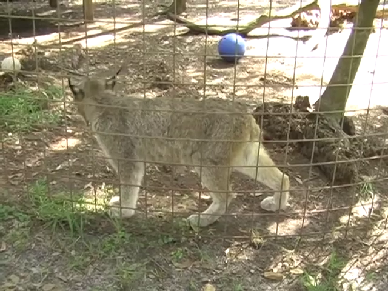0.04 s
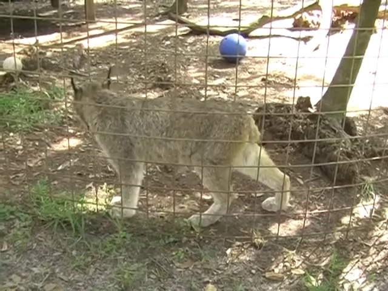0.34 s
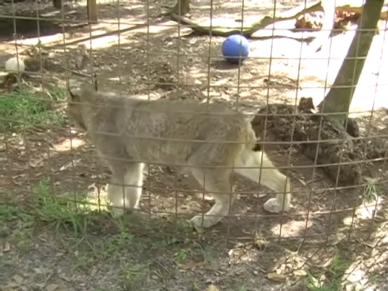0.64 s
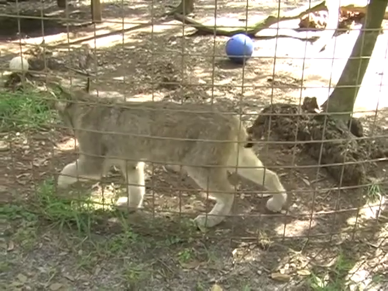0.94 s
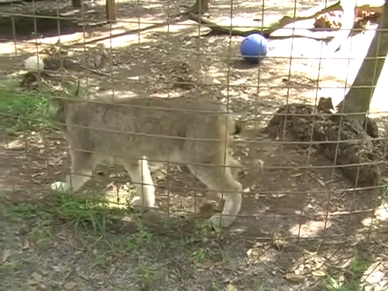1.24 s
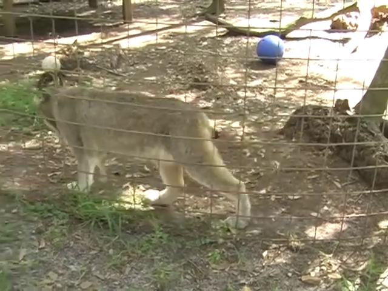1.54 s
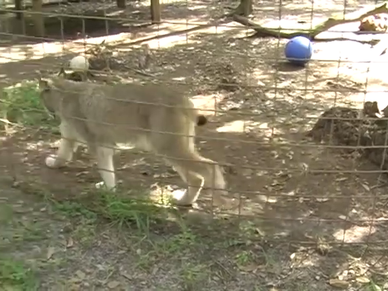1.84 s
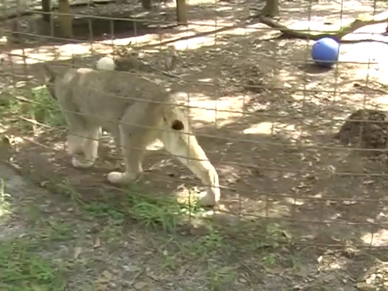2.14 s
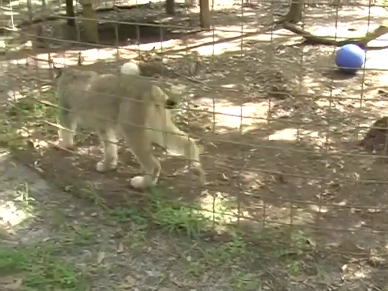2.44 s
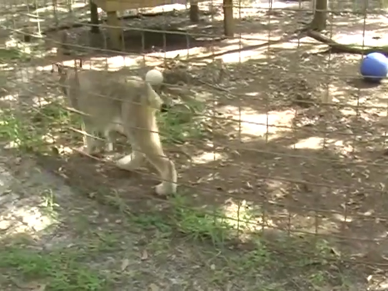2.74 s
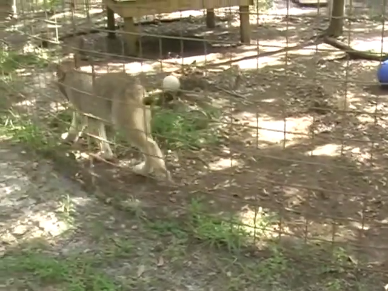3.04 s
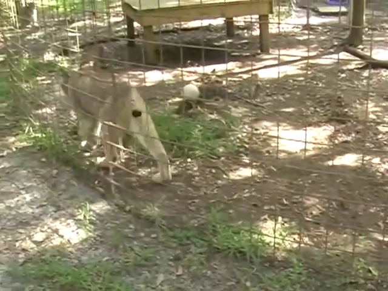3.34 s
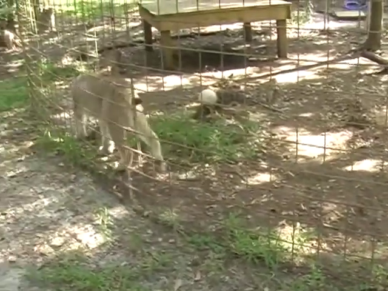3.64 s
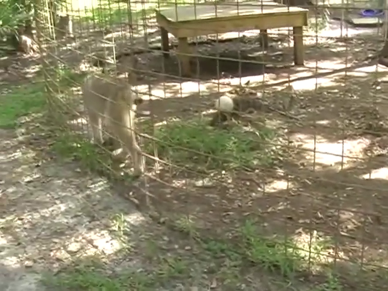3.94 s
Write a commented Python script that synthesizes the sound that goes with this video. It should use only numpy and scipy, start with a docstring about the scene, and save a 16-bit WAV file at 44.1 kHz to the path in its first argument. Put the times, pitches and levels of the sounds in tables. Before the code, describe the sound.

A lynx gives one brief falling call, then faint leaf rustles over a distant engine rumble.

```python
"""An outdoor pen: a distant engine, faint mains hum and thin whines under a steady wash of rumble and hiss. A
lynx ends a short, nearly pure call that falls and roughens as its voice slackens; the pen echoes it. It walks
off over dry leaves: faint crackles under its paws, a few small cracks, one sharp snap. The recorder cuts narrow
notches at even steps and leaves little treble."""
import sys
import numpy as np
from scipy import signal
from scipy.fft import rfft, irfft
from scipy.io import wavfile

SR = 44100
rng = np.random.default_rng(int(sys.argv[2]) if len(sys.argv) > 2 else 0)


def digitize_waveform(pressure):
    """Quantize a signal to 16-bit integers and store it at the path in sys.argv[1].

    Rows of a 2-D input are taken as channels; values are limited to [-1, 1].
    """
    field = np.atleast_2d(pressure).T
    bounded = np.clip(field, -1, 1)
    quanta = np.round(bounded * 32767).astype(np.int16)
    wavfile.write(sys.argv[1], SR, quanta)


N = 176400
T, HZ = np.arange(N) / SR, np.arange(N // 2 + 1) * SR / N

WASH_DB, WASH_FLICKER_DB = -40, .5
ENGINE_HZ, ENGINE_WANDER, ENGINE_PAN_DB, TONE_WAVER_DB = 35.78, .003, -.5, 1.5
SWELL_AT_S, SWELL_WIDTH_S, SWELL_HZ, SWELL_DB = 1.978, .022, 180, -36
STEP_ATTACK_S, GRAINS_PER_S = .015, 2000
CRACK_HOLD_S, CRACK_DECAY_S, RING_DB, RING_DECAY_S = .0018, .0012, -3.5, .0038
PEN_T60_S, PEN_TAIL_DB, CALL_PAN_DB, CALL_RIGHT_LAG_S = .5, -25, .8, .000065
JITTER, SHIMMER_DB, OVERTONE_WAVER_DB, CALL_RELEASE_S = .002, .15, 2.5, .005
SLACK_FALL_HZ, SLACK_ROUGH = 100, 3.0   # the voice slackens over this fall and gains this much roughness
NOTCH_STEP_HZ, NOTCH_FEEDBACK, NOTCH_LEAK, CUTOFF_HZ = 300, .8, .04, 15750


def from_db(db):
    """Decibels to gain."""
    return 10 ** (np.asarray(db) / 20)


def unit_power(x):
    """Scale to an RMS of 1."""
    return x / np.sqrt(np.mean(x ** 2) + 1e-20)


def over_hz(points):
    """A curve through (frequency, value) points along log frequency."""
    hz, value = np.transpose(points)
    return np.interp(np.log(HZ + 1e-9), np.log(hz), value)


def pan(db):
    """Stereo gains that put the left db above the right."""
    return from_db(np.array([[.5], [-.5]]) * db)


def drift(rate_hz):
    """Smooth random modulation of spread 1, mostly slower than rate_hz."""
    spectrum = rfft(rng.standard_normal(N)) / (1 + (HZ / rate_hz) ** 2)
    return unit_power(irfft(spectrum * (HZ > 0), N))


def diffuse_noise(gain):
    """Noise from all around as two microphones get it, with the spectrum gain, at unit power."""
    # stereo width: (frequency [Hz], side against mid [dB])
    widths = [(30, -2), (55, 1), (95, 2), (135, -4), (175, -7), (210, -6.5), (350, -7.5), (520, -11),
              (750, -10), (1600, -6.3), (4200, -7.2), (5700, -6.5), (8000, -7), (10000, -5), (12000, -1.7)]
    # phase between the microphones: (frequency [Hz], left lead [rad])
    lead = [(150, -.05), (450, -0.44), (750, -.27), (1150, -0.8), (1900, -.5), (4200, 0), (5800, -1.7),
            (7200, -2.5), (10000, -3), (12000, -4.5)]
    # balance: (frequency [Hz], left over right [dB])
    balance = [(100, -.7), (750, .4), (1200, -1.6), (1900, -2.9), (3000, -2.6), (5700, .4), (12000, .8)]
    mid, side = np.exp(2j * np.pi * rng.random((2, len(HZ))))
    width = from_db(over_hz(widths))
    pair = (mid + width * side * [[1], [-1]]) / np.hypot(1, width)
    phase_shift = np.exp(1j * over_hz(lead) * [[.5], [-.5]])
    return unit_power(irfft(gain * pair * phase_shift * pan(over_hz(balance)), N))


def wash():
    """A steady bed of distant rumble and hiss whose level flickers slightly."""
    # outdoor noise spectrum: (frequency [Hz], relative density [dB])
    spectrum = [(20, -31), (40, -8), (65, -2), (110, 2), (150, -1.5), (210, 3), (255, 1), (310, -5.5),
                (420, -5.5), (730, 1.5), (1000, -4.5), (1400, -8), (2000, -13), (2900, -15.5),
                (3700, -20.5), (4500, -19), (5900, -24), (7000, -31), (10000, -31), (15500, -40)]
    return from_db(WASH_DB + WASH_FLICKER_DB * drift(8)) * diffuse_noise(from_db(over_hz(spectrum)))


def machinery():
    """A far engine, faint mains hum, thin whines, droning resonances and one brief low swell."""
    # engine orders: (multiple of the engine rate, level [dB], waver [dB])
    orders = [(1, -71, 0.5), (2, -49.5, 1.2), (3, -42.8, .6), (4, -57, 2), (5, -55, 2)]
    # steady tones, faint mains hum and a few thin whines: (frequency [Hz], level [dB])
    steady_tones = [(100, -57), (119.5, -58), (173, -51.5), (308.5, -58), (1006, -64)]
    # machinery resonances: (centre [Hz], half-width [Hz], starting level [dB], change [dB/s])
    resonances = [(176, 12, -50.5, 0), (238.5, 4, -49.5, -.5), (228, 25, -48, -2), (538.6, 5.4, -61, 0),
                  (1154, 8, -63.5, 0)]
    phase = 2 * np.pi * np.cumsum(ENGINE_HZ * (1 + ENGINE_WANDER * drift(1.5))) / SR
    engine = sum(from_db(db + waver_db * drift(1.8)) * np.sin(k * phase + 2 * np.pi * rng.random())
                 for k, db, waver_db in orders)
    tones = sum(from_db(db + TONE_WAVER_DB * drift(2)) * np.sin(2 * np.pi * hz * T + drift(1))
                for hz, db in steady_tones)
    swell_shape = np.exp(-((T - SWELL_AT_S) / SWELL_WIDTH_S) ** 2 / 2)
    swell = from_db(SWELL_DB) * swell_shape * np.sin(2 * np.pi * SWELL_HZ * T)
    drones = sum(from_db(db + change * T) * diffuse_noise(1 / (1 + ((HZ - hz) / width) ** 2))
                 for hz, width, db, change in resonances)
    return np.sqrt(2) * (engine + tones + swell) * pan(ENGINE_PAN_DB) + drones


def paws():
    """Each step presses a short cloud of tiny crackles out of the leaves."""
    # footfalls: (time [s], level [dB], decay [s])
    steps = [(1.525, -62, .04), (2.198, -61, .015), (2.63, -59.5, 0.069), (3.39, -54.5, 0.028)]
    # leaf rustle spectrum: (frequency [Hz], relative density [dB])
    rustle = [(1500, -14), (4000, -3), (7500, -6), (11500, 4), (15500, -5)]
    press = sum(from_db(db) * np.exp(-np.maximum((at - T) / STEP_ATTACK_S, (T - at) / decay))
                for at, db, decay in steps)
    grains = rng.standard_normal((2, N)) * (rng.random(N) < GRAINS_PER_S / SR)
    return press * unit_power(irfft(rfft(grains) * from_db(over_hz(rustle)), N))


def cracks():
    """Dry twigs and leaves break in bursts of a few milliseconds; each broken piece rings briefly."""
    # breaks: (time [s], level [dB], left over right [dB], ring [Hz])
    breaks = [(1.579, -57, 0, 10500), (2.613, -42, 4, 5200), (2.616, -38.5, 4, 3420),
              (2.728, -58, 0, 13000), (3.7421, -27.5, 0.5, 4600)]
    # burst spectrum: (frequency [Hz], relative density [dB])
    spectrum = [(300, -4), (750, 6), (1400, -2), (4200, -2), (6100, -3), (7000, -17), (9000, -7),
                (11000, -18), (15500, -21)]
    out, burst = 0, diffuse_noise(from_db(over_hz(spectrum)))
    for at, db, pan_db, ring_hz in breaks:
        age = np.maximum(T - at, 0)
        snap = burst * np.exp(-np.maximum(age - CRACK_HOLD_S, 0) / CRACK_DECAY_S) * (T >= at)
        ring = from_db(RING_DB) * np.sin(2 * np.pi * ring_hz * age) * np.exp(-age / RING_DECAY_S)
        out = out + from_db(db) * pan(pan_db) * (snap + ring)
    return out


def pen(voice):
    """The voice and a few echoes reach the left microphone first; a faint scattered tail follows."""
    # reflections off the pen: (delay [s], level against the voice [dB])
    echoes = [(.034, -35), (.071, -30), (.098, -30.5)]
    send = voice * np.minimum(T / .019, 1)   # fades in, so the reflections start softly
    early = voice + sum(from_db(db) * np.interp(T - delay, T, send, left=0) for delay, db in echoes)
    pair = np.array([early, np.interp(T - CALL_RIGHT_LAG_S, T, early)])
    scatter = rng.standard_normal((2, SR)) * from_db(-60 * T[:SR] / PEN_T60_S)
    tail = signal.fftconvolve(send[None], unit_power(scatter) / np.sqrt(SR), axes=1)[:, :N]
    return pair * pan(CALL_PAN_DB) + from_db(PEN_TAIL_DB) * tail


def lynx_call():
    """A nearly pure tone with two faint overtones; it roughens as it slackens and ends in a quick drop."""
    # voice contour: (time [s], pitch [Hz], fundamental [dB], second harmonic [dB], third harmonic [dB])
    contour = [(0, 743, -12.5, -57, -53), (.066, 731, -13.5, -53, -55), (.094, 709.4, -16, -57, -57.5),
               (.13, 689, -16, -52.5, -51.5), (.172, 662, -20, -45.5, -50.5),
               (.205, 647.5, -23.5, -45, -56), (.221, 626.4, -30, -44, -43), (0.239, 543, -32.5, -48, -50),
               (.251, 500, -52, -50, -62)]
    times, *columns = np.transpose(contour)
    pitch, fundamental_db, *overtones_db = [np.interp(T, times, column) for column in columns]
    slack = np.clip((pitch[0] - pitch) / SLACK_FALL_HZ, 0, 1)
    roughness = 1 + SLACK_ROUGH * slack ** 2
    cycles_per_sample = pitch * (1 + JITTER * roughness * drift(90)) / SR
    phase = 2 * np.pi * (np.cumsum(cycles_per_sample) - cycles_per_sample)
    voice = from_db(fundamental_db) * np.sin(phase)
    for k, db in enumerate(overtones_db, 2):
        voice += from_db(db + OVERTONE_WAVER_DB * drift(60.1)) * np.sin(k * phase)
    shimmer = from_db(SHIMMER_DB * roughness * drift(70))
    release = np.exp(-np.maximum(T - times[-1], 0) / CALL_RELEASE_S)
    return np.sqrt(2) * voice * shimmer * release


def scene():
    """The lynx calls and walks off in front of the distant background."""
    return pen(lynx_call()) + machinery() + wash() + paws() + cracks()


def record(dry):
    """The recorder combs the sound with narrow notches, then cuts the top steeply."""
    gap = np.zeros(SR // NOTCH_STEP_HZ - 1)
    pre_roll = SR // 10   # a mirrored start lets the filters settle
    padded = np.hstack([-dry[:, pre_roll:0:-1], dry])
    feedforward = np.r_[1, gap, -1] * (1 + NOTCH_FEEDBACK) / 2
    notched = signal.lfilter(feedforward, np.r_[1, gap, -NOTCH_FEEDBACK], padded)
    combed = notched + NOTCH_LEAK * (padded - notched)
    lowpass = signal.ellip(10, .1, 80, CUTOFF_HZ, fs=SR, output="sos")
    return signal.sosfilt(lowpass, combed)[:, pre_roll:]


dry = scene()
out = record(dry)
digitize_waveform(out)
```